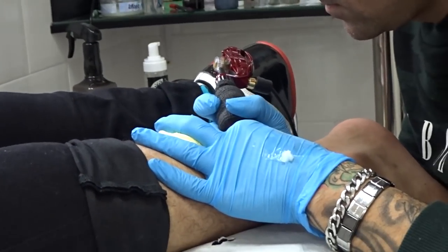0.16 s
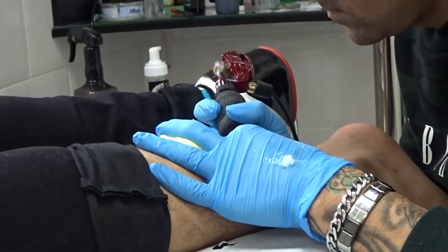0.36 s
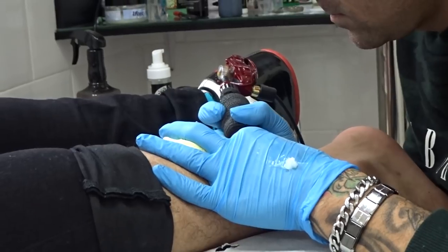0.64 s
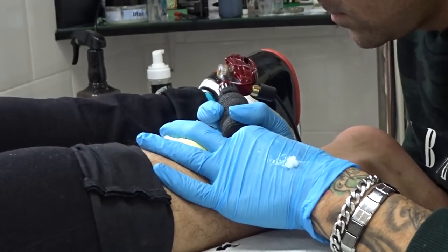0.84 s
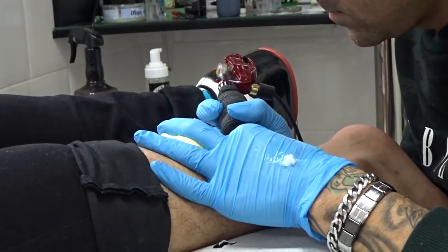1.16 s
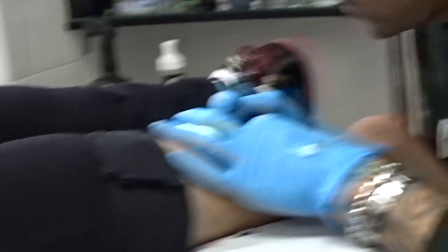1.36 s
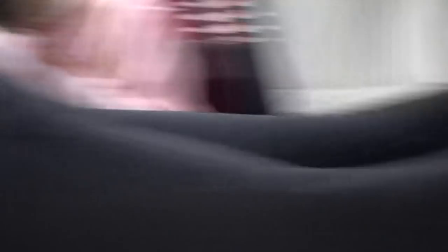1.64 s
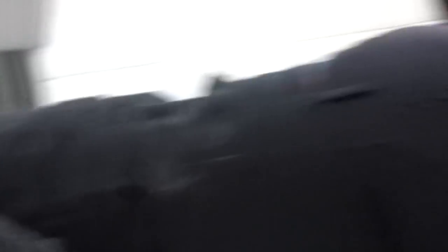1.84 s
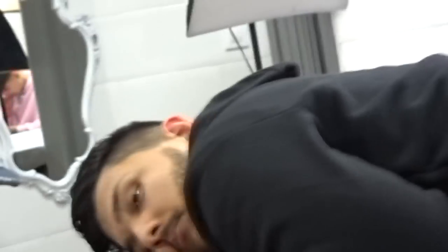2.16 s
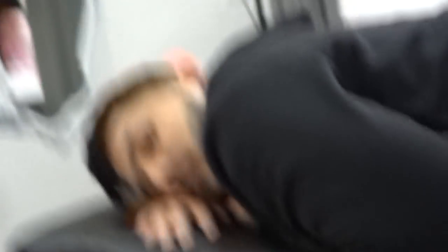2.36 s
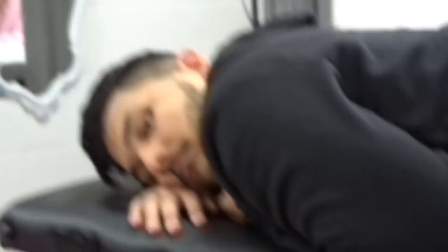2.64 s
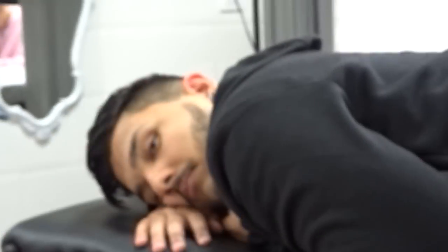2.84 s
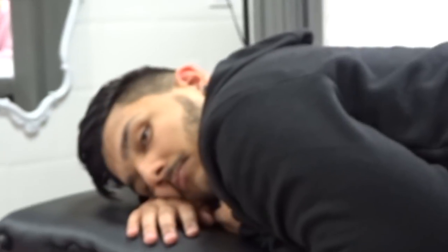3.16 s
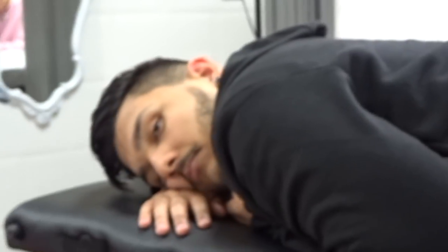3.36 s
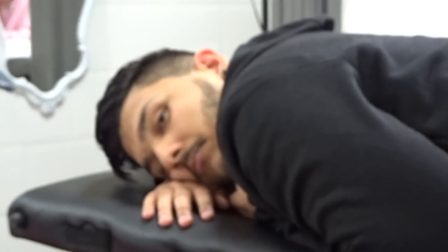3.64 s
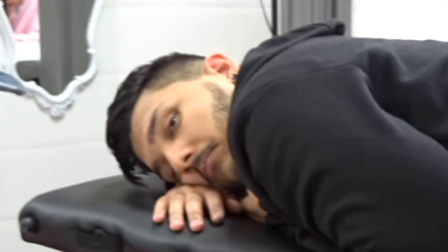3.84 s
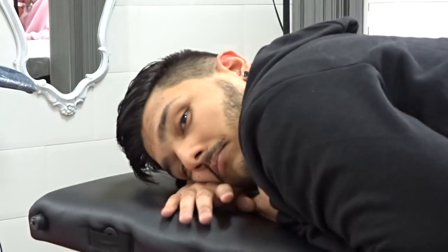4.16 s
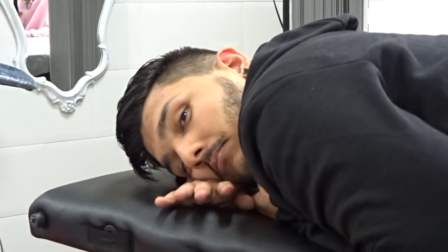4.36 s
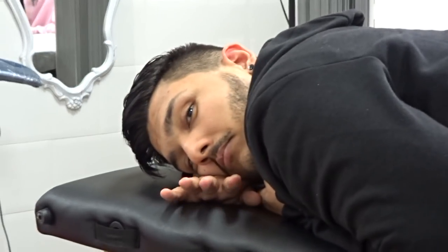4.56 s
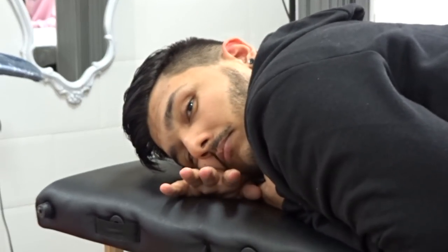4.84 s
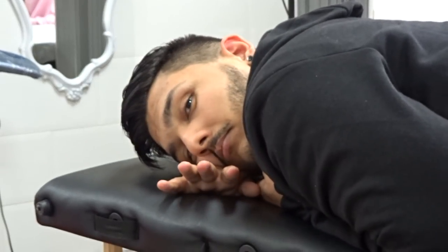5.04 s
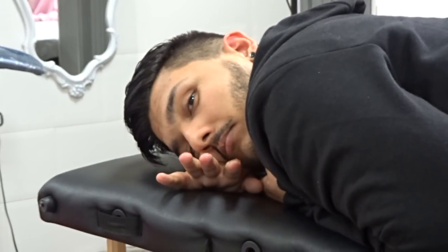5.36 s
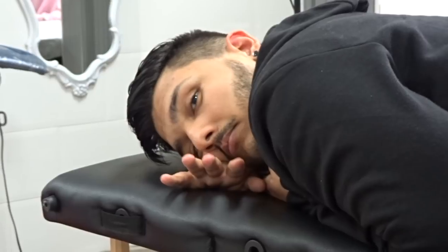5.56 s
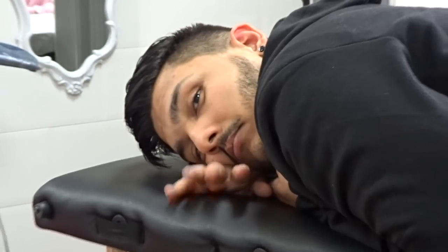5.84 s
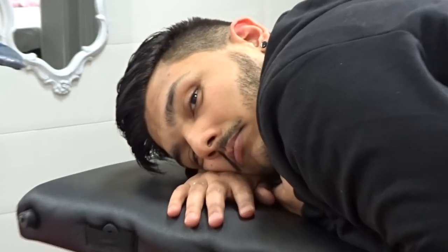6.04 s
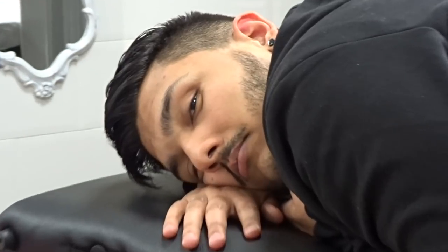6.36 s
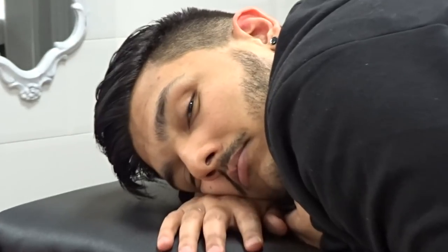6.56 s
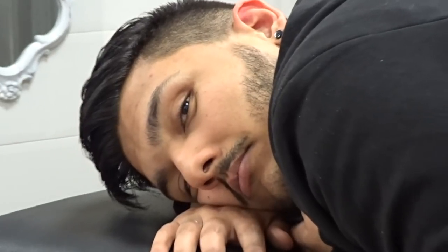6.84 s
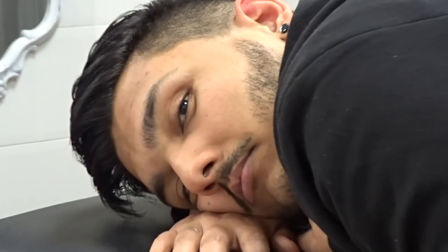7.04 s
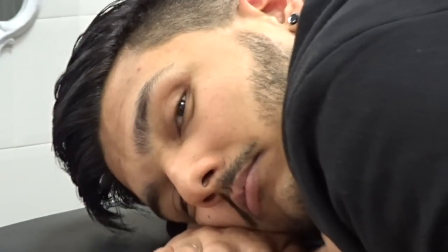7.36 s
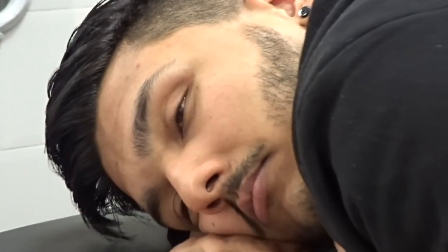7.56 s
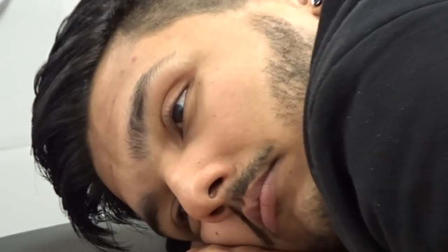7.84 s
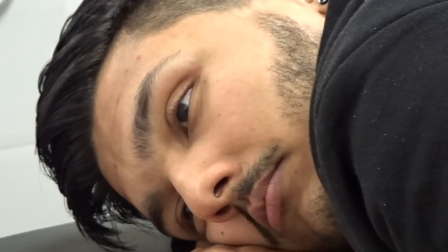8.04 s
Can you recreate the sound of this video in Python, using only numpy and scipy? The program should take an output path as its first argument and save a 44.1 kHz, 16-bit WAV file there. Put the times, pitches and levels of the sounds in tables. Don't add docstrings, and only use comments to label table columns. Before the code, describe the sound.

In a tiled studio, an electric tattoo needle buzzes in a thin piercing whine, wavering slightly, with handling clicks, room knocks and fabric rubbing near the end.

```python
import sys
import numpy as np
from scipy import signal
from scipy.fft import rfft, irfft, next_fast_len
from scipy.io import wavfile

SR = 44100
rng = np.random.default_rng(int(sys.argv[2]) if len(sys.argv) > 2 else 0)


def gain_from_db(level_db):
    decades = np.asarray(level_db, float) / 20
    return 10 ** decades


def dump(signal):
    limited = np.clip(np.atleast_2d(signal).T, -1, 1)
    pcm = np.round(limited * 32767).astype(np.int16)
    wavfile.write(sys.argv[1], SR, pcm)


N = 361158

TIME = np.arange(N) / SR
SIZE = next_fast_len(N + SR // 2)
HZ = np.maximum(np.arange(SIZE // 2 + 1) * SR / SIZE, 1)
SIDES = np.array([[1], [-1]])

FREE_HZ = 2406.8
WHINE_ORDER = 6
STROKES_PER_TOOTH = 8 / 35


def machine():
    hz = loaded_speed()
    away = turned()
    tooth = np.cumsum(hz / WHINE_ORDER) / SR
    whine = main_whine(hz, tooth, away)
    partials = gain_from_db(0.5 + 2.5 * away) * shaft_partials(hz, tooth, away)
    rattle = gain_from_db(0.5) * housing_rattle(tooth, away)
    return gain_from_db(curves(RATTLE_LEVEL)[0]) * (whine + partials + rattle)


# time_s, sag_hz, onset_s, recovery_s
PRESSES = [(0.53, 17.5, 0.18, 0.11), (1.09, 14.0, 0.15, 0.15), (1.65, 22.5, 0.1, 0.06),
           (2.15, 11.0, 0.18, 0.29), (2.62, 12.0, 0.11, 0.24), (2.93, 11.5, 0.06, 0.28),
           (3.69, 24.0, 0.14, 0.1), (4.31, 18.5, 0.1, 0.11), (4.93, 20.0, 0.24, 0.18),
           (5.76, 12.0, 0.11, 0.05), (5.9, 16.0, 0.04, 0.33), (6.72, 20.5, 0.11, 0.09),
           (7.2, 17.5, 0.1, 0.04), (7.62, 19.5, 0.11, 0.05), (8.27, 21.5, 0.21, 0.5)]
# time_s, sag_hz, onset_s, recovery_s
LIFT = [
    (5.49, -7, .035, .035),
]


def loaded_speed():
    hz = FREE_HZ
    for s, sag_hz, onset, recovery in [*PRESSES, *LIFT]:
        hz = hz - sag_hz * bump(s, onset, recovery)
    return hz


def main_whine(hz, tooth, away):
    lag = 0.26 + 0.21 * away
    whine = np.sqrt(2) * np.sin(2 * np.pi * WHINE_ORDER * tooth - SIDES * lag)
    return whine_path(hz, away) * whine


WAVE_HZ = [2383, 2387, 2391, 2395, 2399, 2403, 2407, 2413]
WAVE_FACING_DB = [-1, 0, 0.86, 2.1, 2, 1.2, 0.44, 1]
WAVE_AWAY_DB = [7.9, 5.7, 1.2, 1.6, 4.9, 5.6, 7.2, 1.4]
WAVE_FACING_PAN_DB = [-6, 2, 1, -4, -5.5, -3.5, -1, 2]
WAVE_AWAY_PAN_DB = [-3, -4.5, -5, -8.5, -3.5, -6, -3, 12]
# time_s, change_db, half_length_s, pan_db
NULLS = [(0.447, 2.5, .06, -2), (1.0, -3, .05, -3), (1.64, -5, .035, -7), (1.76, -11, 0.024, -2),
         (1.897, -19, 0.055, 1), (2.048, -20, 0.028, 2), (2.383, -8, 0.048, -12), (2.655, -10, 0.037, -5),
         (3.565, 0.5, 0.035, 3), (3.82, -4, 0.032, -1), (4.1, 4, 0.046, 2), (4.297, -3, 0.02, 0),
         (4.422, 3.5, 0.048, 4), (4.828, -4.5, 0.049, 0), (6.88, 0, 0.028, -1), (7.54, -2, .02, 1),
         (7.716, -3.5, 0.086, 0)]


def whine_path(hz, away):
    def blend(facing, turned_away):
        return np.interp(hz, WAVE_HZ, facing) * (1 - away) + np.interp(hz, WAVE_HZ, turned_away) * away

    db = blend(WAVE_FACING_DB, WAVE_AWAY_DB)
    pan_db = blend(WAVE_FACING_PAN_DB, WAVE_AWAY_PAN_DB)
    for s, change_db, half, tilt_db in NULLS:
        spot = bump(s, half, half)
        db = db + change_db * spot
        pan_db = pan_db + tilt_db * spot
    wander = np.array([sway(14, 1.03), sway(14, 1.03)])
    return gain_from_db(db + SIDES * pan_db / 2) * wander


# stroke_multiple, facing_db, away_db
STROKE_PARTIALS = [(10, -33, -40), (13, -36, -24), (15, -20, -21), (16, -32, -32), (17, -29, -27),
                   (18, -21, -22), (19, -33, -24), (20, -24, -28), (21, -25, -21), (23, -29, -26),
                   (24, -32, -30), (25, -33, -27), (33, -21, -19), (34, -27, -25), (36, -19, -19),
                   (37, -18, -23), (38, -20, -29), (39, -21, -26), (42, -31, -40), (43, -29, -37),
                   (44, -29, -40), (45, -30, -35), (46, -25, -25), (47, -30, -29), (48, -31, -40),
                   (49, -31, -42), (50, -33, -37)]
# tooth_multiple, stroke_multiple, facing_db, away_db
MESH_PARTIALS = [(3, 0, -35, -26), (5, 0, -16, -13.5), (5, 1, -28, -22), (5, 5, -17, -14),
                 (6, -1, -23, -23), (6, 1, -4, -9), (6, 2, -29, -16), (7, -2, -13, -19), (7, 0, -11, -18),
                 (7, 1, -23, -28), (8, 0, -18, -16), (8, 5, -25, -28), (8, 6, -31, -29), (9, 0, -20, -21),
                 (9, 1, -20, -27), (11, 0, -31, -32), (16, 0, -14, -15), (15, 5, -15, -13),
                 (16, 2, -15, -14)]
# tooth_multiple, stroke_multiple, facing_db, away_db
EXTRA_PARTIALS = [(0, 7, -27, -33), (0, 9, -33, -29), (0, 27, -23, -17), (5, 6, -21, -17),
                  (7, -3, -21, -18), (0, 30, -27, -22), (0, 31, -33, -21), (0, 32, -28, -22),
                  (10, 0, -28, -42), (7, -5, -26, -29), (5, 2, -31, -31), (9, 2, -36, -34)]


def shaft_partials(hz, tooth, away):
    panel_hz, panel_width_hz, panel_db = 2588, 7, 9
    shaft = (2 * np.pi * (tooth / 35 % 1)).astype(np.float32)
    stroke_rows = [(0, *row) for row in STROKE_PARTIALS]
    partials = 0
    for teeth, strokes, facing_db, away_db in [*stroke_rows, *MESH_PARTIALS, *EXTRA_PARTIALS]:
        order = 35 * teeth + 8 * strokes
        gain = gain_from_db(facing_db) + (gain_from_db(away_db) - gain_from_db(facing_db)) * away
        gain = gain * sway(5, 2.2)
        if abs(order * FREE_HZ / 210 - panel_hz) < 15:
            offset = (order * hz / 210 - panel_hz) / panel_width_hz
            gain = gain * gain_from_db(panel_db * np.exp(-0.5 * offset ** 2))
        start = np.float32(2 * np.pi * rng.random())
        partials = partials + gain * np.sqrt(2) * np.sin(order * shaft + start)
    return heard(partials, away, -9.0, -4, -4.0)


# centre_hz, width_hz, facing_db, away_db
HOUSING = [(2440, 86, -16, -5.5), (2540, 210, -8, -6.5), (2850, 940, -30, -35), (3430, 540, -15.5, -17.5),
           (5540, 640, -11.5, -12.5), (6165, 200, -3.5, -6), (6310, 85, -11, -11.5), (6410, 425, -1, 1.5),
           (6740, 100, -31, -13), (6867, 180, -9.5, -9.5), (7524, 310, -11, -10), (8500, 760, -15.5, -13),
           (9176, 820, -12, -8.5), (10850, 320, -23, -23)]
# time_s, level_db
RATTLE_LEVEL = [(0, -30.5), (.1, -33), (1.55, -33), (1.76, -33.5), (2.0, -37.5), (2.12, -34.5),
                (2.2, -35.5), (3.15, -37), (4.4, -36), (4.85, -35), (5.1, -37), (5.6, -36), (6.3, -37),
                (7.0, -36.5), (7.9, -36.5), (8.03, -34), (8.19, -37.5)]


def housing_rattle(tooth, away):
    locked_share, locked_above_hz = 0.3, 4700
    stroke = tooth * STROKES_PER_TOOTH
    locked = cycle(tooth, count=40, tilt=0.) * cycle(stroke, count=14, tilt=1.0)
    swell = 1 + 0.6 * np.cos(2 * np.pi * stroke)
    loose = rng.standard_normal(N) * swell * sway(40, 1.2)
    power = 0
    for f, width, facing_db, away_db in HOUSING:
        peak = gain_from_db(np.array([[facing_db], [away_db]]))
        power = power + (peak / (1 + ((HZ / f - f / HZ) * f / width) ** 2)) ** 2
    contact = shaped(locked, locked_share / (1 + (locked_above_hz / HZ) ** 8)) + loose
    front, back = shaped(contact, np.sqrt(power))
    return unit(heard(front * (1 - away) + back * away, away, 10.0, 4.3, 0.078), 4900, 7200)


def cycle(phase, count, tilt):
    orders = np.arange(1, count + 1)
    spectrum = orders ** -tilt * np.exp(2j * np.pi * rng.random(count))
    shape = irfft(np.r_[0, spectrum], 4096)
    return np.interp(phase % 1 * 4096, np.arange(4096), shape / shape.std(), period=4096)


# start_s, ring_db, slap_db, slap_pan_db
KNOCKS = [
    (2.7205, -19, -18, 11),
    (2.969, -19, -20, 0),
    (3.333, -17, -16.5, 6),
]
# start_s, peak_db
THUDS = [
    (2.712, -31.5),
    (6.751, -37),
]
# start_s, peak_db, ring_hz, width_hz, pan_db
SNAPS = [
    (2.1376, -17.5, 3500, 1600, 11),
    (2.137, -13, 8000, 6000, 12),
    (2.1369, -13, 15000, 1600, 4),
    (2.1955, -23, 3500, 4000, 0),
    (4.6895, -19, 2800, 5000, 3),
    (8.078, -15, 12000, 7000, -7),
]


def taps():
    ring, slap, thud = (1400, 900, 0.0012), (3000, 3600, 0.003), (450, 400, 0.008)  # Hz, width Hz, decay s
    body = (2200, 3600, 0.018)
    far = [(s, db, *thud, 0) for s, db in THUDS]
    for s, ring_db, slap_db, pan_db in KNOCKS:
        far.append((s, ring_db, *ring, 1))
        far.append((s + 0.007, slap_db, *slap, pan_db))
        far.append((s, ring_db - 9, *body, 2))
    near = [(s, db, hz, width, 0.0011, pan_db) for s, db, hz, width, pan_db in SNAPS]
    tail = room(bursts(far, 5.0).mean(axis=0))
    tail = shaped(tail, 1 / (1 + (HZ / 4500) ** 4) / (1 + (350 / HZ) ** 4))
    return bursts(far, 0.58) + gain_from_db(6.5) * tail + bursts(near, 0.88)


def bursts(table, widen):
    out, t = np.zeros((2, N)), TIME[:2048]
    for s, db, hz, width_hz, decay, pan_db in table:
        burst = np.exp(-t / decay) * (rng.standard_normal(2048) + 3 * (t == 0))
        edges = [max(hz - widen * width_hz / 2, 251), min(hz + widen * width_hz / 2, 0.45 * SR)]
        burst = signal.sosfilt(signal.butter(2, edges, "bandpass", fs=SR, output="sos"), burst)
        i = int(s * SR)
        out[:, i:i + 2048] += gain_from_db(db + SIDES * pan_db / 2) * burst / abs(burst).max()
    return out


# pitch_hz, density_db_per_hz
CLOTH = [(200, -60), (600, -16), (1200, 0), (1600, 3.5), (2200, 1.5), (3200, -1.5), (6000, -35)]
# start_s, length_s, level_db
RUBS = [(4.05, 0.096, -48), (4.15, .05, -41), (4.31, .07, -40), (5.46, .15, -45), (5.706, .11, -43),
        (5.977, 0.23, -43), (6.96, .1, -41.5), (7.08, .13, -38.5), (7.23, .06, -45), (7.399, 0.14, -36.5),
        (7.573, 0.066, -37.5), (7.675, 0.22, -44.5), (7.92, 0.069, -36), (8.012, 0.081, -36),
        (8.12, .07, -42)]


def rustle():
    attack_s, release_s = 0.024, 0.08
    gain = 0
    for s, length, db in RUBS:
        rise = (TIME - s) / attack_s
        fall = 1 + (s + length - TIME) / release_s
        gain = gain + gain_from_db(db) * np.clip(np.minimum(rise, fall), 0, 1)
    cloth = unit(wide_noise(CLOTH, 0.47, range(10, 13)), 1092, 1990)
    return gain * sway(150, 1.8) * gain_from_db(-3.5) * cloth


# pitch_hz, density_db_per_hz
AIR = [(18, -58), (30, -49), (178, -26.5), (365, -5.5), (461, -10.5), (637, -6), (1280, -8), (1620, -8),
       (1810, -10), (2050, -5), (2200, -5.5), (2860, -38), (4840, -120)]
# pitch_hz, density_db_per_hz
HISS = [(1200, -16.5), (2500, 4), (4000, 5), (5000, 4.5), (7500, 3.5), (9000, -20)]
# pitch_hz, density_db_per_hz
TOP_HISS = [(9000, -4), (10800, -1), (12600, -6.5), (13800, -3), (15000, 0.5), (15800, -3.5)]
# middle_s, half_length_s, lift_db
SWEEPS = [
    (2.955, 0.13, 6),
    (5.1, 0.085, 0),
]


def studio():
    sweep_db = sum(db * bump(s, half, half) for s, half, db in SWEEPS)
    air_db = floor_db(-47, -47, -2.5) + 0.3 * sweep_db
    hiss_db = floor_db(-41, -42.5, -18) + 0.42 * sweep_db
    top_db = floor_db(-45.5, -48, -7.5) + sweep_db
    air = wide_noise([*AIR, (4000, -28), (16000, -66)], 0.84, range(7, 13))
    hiss = wide_noise([(300, -56), *HISS, (12000, -60)], 1.0, range(10, 14))
    top = wide_noise([(6000, -64), *TOP_HISS], 1.3, range(13, 15))
    air = gain_from_db(air_db + 0.5) * unit(air, 240, 1080)
    hiss = gain_from_db(hiss_db - 4.0) * unit(hiss, 4020, 5350)
    top = gain_from_db(top_db) * unit(top, 10300, 16300)
    own = rng.standard_normal((3, N))
    preamp = gain_from_db(-57) * shaped(own[0] + 0.5 * own[1:], 1 / (1 + (HZ / 110) ** 2))
    return air + hiss + top + appliance_hum() + preamp


# time_s, pitch_hz, level_db
HUM = [
    (0, 136, -93),
    (1.8, 134.7, -84),
    (2.1, 136.6, -72.5),
    (4.1, 139.9, -76.5),
    (4.4, 139.2, -89),
    (5.8, 138.2, -76),
    (6.2, 136.4, -92),
    (8.19, 139, -88),
]


def appliance_hum():
    hum_hz, hum_db = curves(HUM)
    turn = 2 * np.pi * np.cumsum(hum_hz) / SR
    return gain_from_db(hum_db) * np.sqrt(2) * (np.sin(turn) + 3.2 * np.sin(2 * turn))


def floor_db(facing_db, away_db, thin_db):
    start_s, end_s, fade_s = 5.73, 7.99, 0.16
    thin = np.clip(np.minimum(TIME - start_s, end_s - TIME) / fade_s + 0.5, 0, 1)
    return facing_db + (away_db - facing_db) * turned() + thin_db * thin


# pitch_hz, likeness_0_to_1
ALIKE = [(30, .7), (130, 0.94), (300, 1), (700, 0.9), (1500, 0.65), (3100, 0.4), (6800, 0), (15000, 0.17)]


def wide_noise(table, sway_db, octaves):
    alike = np.clip(over_hz(ALIKE), 0, 1)
    mid, side = rfft(rng.standard_normal((2, SIZE)))
    both = gain_from_db(over_hz(table)) * (np.sqrt(1 + alike) * mid + SIDES * np.sqrt(1 - alike) * side)
    place = np.clip(np.log2(HZ), octaves[0], octaves[-1])
    out = 0
    for k in octaves:
        octave = np.clip(1 - abs(place - k), 0, 1)
        out = out + sway(9, sway_db) * irfft(both * octave, SIZE)[:, :N]
    return out


def room(x):
    t60_s = 0.5
    t = TIME[:SR // 2]
    echoes = rng.standard_normal((2, len(t))) * gain_from_db(-60 * t / t60_s) * (t > 0.004)
    echoes[1] = 0.5 * echoes[0] + 5.2 * echoes[1]
    echoes = echoes / np.sqrt(np.sum(echoes ** 2, axis=1, keepdims=True))
    return shaped(x, rfft(echoes, SIZE))


def heard(x, away, facing_wet_db, away_wet_db, pan_db):
    late = np.interp(np.arange(N) - 3.3 * away, np.arange(N), x)
    direct = np.array([late * gain_from_db(pan_db / 2), x * gain_from_db(-pan_db / 2)])
    wet = gain_from_db(facing_wet_db + (away_wet_db - facing_wet_db) * away)
    return (direct + wet * room(x)) / np.sqrt(1 + wet ** 2)


def turned():
    return np.interp(TIME, (1.42, 2.7), (0, 1))


def sway(rate, db):
    draws = rng.standard_normal(int(N / SR * rate) + 4)
    steps = np.convolve(draws, (0.5, 0.5), "valid") * np.sqrt(2)
    return np.interp(TIME * rate, np.arange(len(steps)), gain_from_db(db * steps))


def bump(s, before, after):
    out = np.zeros(N)
    part = slice(max(int((s - 5 * before) * SR), 0), int((s + 5 * after) * SR))
    t = TIME[part]
    out[part] = np.exp(-0.5 * ((t - s) / np.where(t < s, before, after)) ** 2)
    return out


def curves(table):
    s, *columns = np.transpose(table)
    return [np.interp(TIME, s, c) for c in columns]


def over_hz(table):
    hz, value = np.transpose(table)
    return np.interp(np.log(HZ), np.log(hz), value)


def shaped(x, gain):
    return irfft(rfft(x, SIZE) * gain, SIZE)[..., :N]


def unit(x, lo_hz, hi_hz):
    band = shaped(np.mean(x, axis=0), (HZ > lo_hz) & (HZ < hi_hz))
    return x / np.sqrt(np.mean(band ** 2))


def scene():
    return machine() + taps() + rustle() + studio()


def low_pass(x):
    return signal.sosfilt(signal.butter(12, 15800, fs=SR, output="sos"), x)


def record(dry):
    duck_s, duck_db, release_s = 2.141, -6, 0.95
    since = TIME - duck_s
    ducked = dry * gain_from_db(duck_db * (since > 0) * np.exp(-abs(since) / release_s))
    return low_pass(ducked)


dry = scene()
out = record(dry)
dump(out)
```